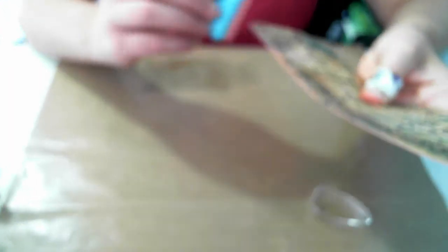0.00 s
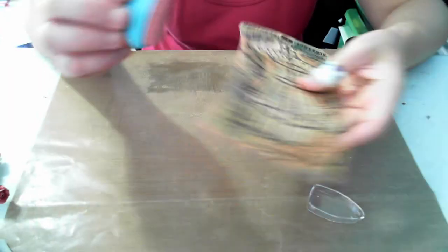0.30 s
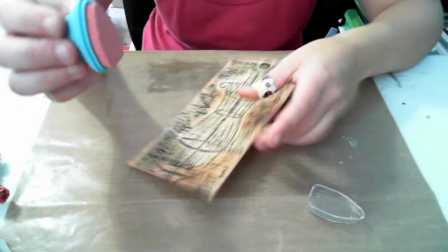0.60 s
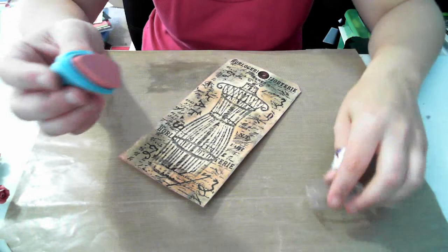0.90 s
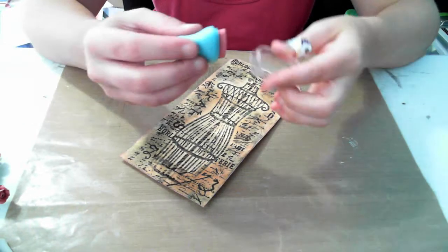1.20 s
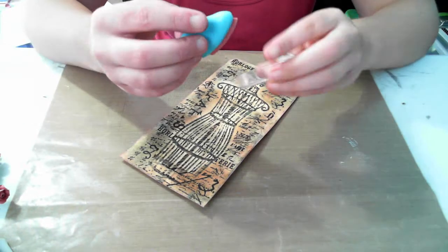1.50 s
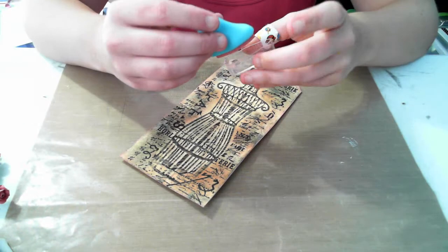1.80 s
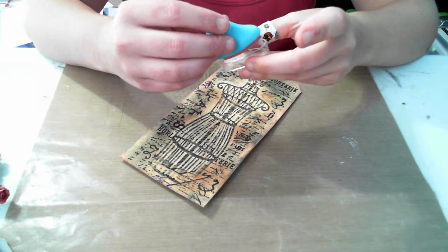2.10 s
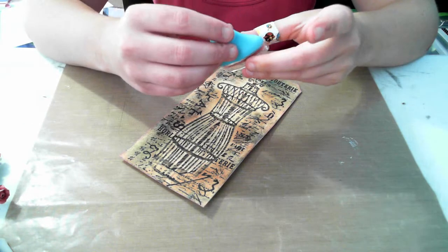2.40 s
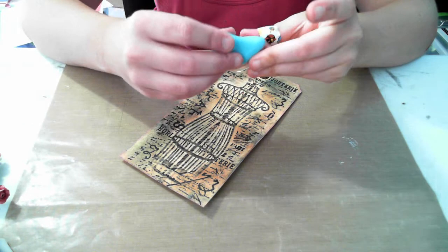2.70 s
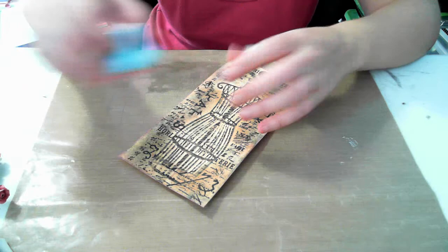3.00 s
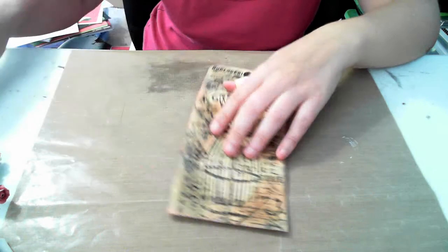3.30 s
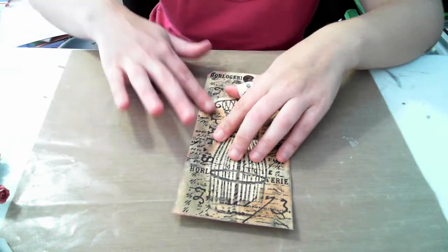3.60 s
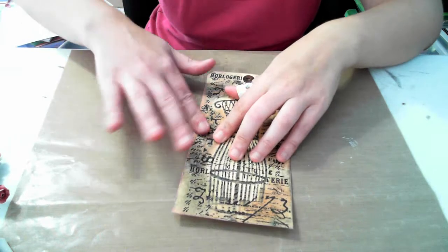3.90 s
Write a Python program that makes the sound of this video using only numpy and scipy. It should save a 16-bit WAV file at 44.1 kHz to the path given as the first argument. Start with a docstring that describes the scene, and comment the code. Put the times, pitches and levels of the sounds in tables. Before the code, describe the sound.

A small tool lands on a table with one loud knock. Before it, stiff card slaps down lightly and a plastic cap clicks on; afterwards, hands slide over the card. A fan hums in the small room.

```python
"""A stiff card flexes and slaps onto a mat, close up, over the rumble and hum of a fan in a small room.
Fingers lift a plastic cap, a leaning hand makes the table boom softly, and the cap snaps onto a small
tool. The tool is put down so hard that the microphone overloads, and rocks to rest. Hands then slide
over card and mat with a grainy hiss. Each contact is a set of ringing modes plus a burst of noise."""
import sys
import numpy as np
from scipy import signal
from scipy.fft import rfft, irfft, next_fast_len
from scipy.io import wavfile
from scipy.ndimage import map_coordinates

SR = 44100
rng = np.random.default_rng(int(sys.argv[2]) if len(sys.argv) > 2 else 0)


def pcm_store(signal):
    """Save signal as 16-bit PCM."""
    levels = np.round(np.clip(np.atleast_2d(signal), -1, 1) * 32767)
    wavfile.write(sys.argv[1], SR, levels.astype(np.int16).T)


N = 176400

# the tool lands and bounces: t/s, level/dB, low-pass f/Hz
TOOL_LANDING = [(3.2218, -1.5, 13700), (3.2308, -1.5, 10600), (3.2397, -10.5, 4030)]
# ring of the table top: f/Hz, level/dB, t60/s
TABLE_MODES = [(212.5, -5.5, 0.12), (230.3, -7.5, 0.13), (304, -6, 0.088), (437, 1.5, 0.086),
               (546, -4, 0.13), (662, -5.5, 0.094), (703, -2.5, .13), (757, -9.5, 0.15), (858, -10, 0.16),
               (896.5, -6.5, .13), (920, -9, 0.1), (1020, -9, 0.11), (1154, -9, .13), (1350, -16, 0.17),
               (2620, -17.5, 0.12), (2770, -20, .2)]
# the tool rocks to rest: t/s, level/dB, low-pass f/Hz
TOOL_ROCKS = [(3.3555, -22, 1400), (3.3665, -32, 900), (3.396, -25, 1200), (3.429, -27, 1500),
              (3.449, -41, 900)]
# ring of the tool against the table: f/Hz, level/dB, t60/s
TOOL_MODES = [(450, -5, .045), (570, 0, .035), (720, -2, .025)]
# noise colour of each knock: f/Hz, level/dB
KNOCK_EQ = [(150, -7), (300, -4), (550, -0.5), (1100, -1), (1750, -9.5), (2300, -9), (2750, -7.5),
            (3300, -14), (5800, -21.5), (7500, -18), (10000, -22.5), (16000, -19)]

def tool():
    """The tool hits hard and sets the table top ringing, then rocks with small, dull knocks."""
    landing = strikes(TOOL_LANDING, TABLE_MODES, KNOCK_EQ, blur=0.0013, ring_db=-2.5, attack_s=0.00065,
                      crack_db=0.5, crack_t60=0.014, rustle_db=-8.5, rustle_t60=0.17, wet_db=-14)
    rocking = strikes(TOOL_ROCKS, TOOL_MODES, KNOCK_EQ, blur=0.03, ring_db=0, attack_s=0.001,
                      crack_db=-6, crack_t60=0.02, rustle_db=-20, rustle_t60=0.05, wet_db=-14)
    return landing + rocking


# fingers lift the cap off the mat: t/s, level/dB, low-pass f/Hz
CAP_LIFT = [(.8754, -46, 12000), (.891, -37, 2200), (.899, -43.5, 1500), (.922, -41, 1400)]
# damped body of the mat: f/Hz, level/dB, t60/s
MAT_MODES = [(224, 4, 0.056), (570, 4.5, 0.057), (893, -7.5, 0.066), (1503, -3.5, 0.054)]
# noise colour of a bump on the mat: f/Hz, level/dB
MAT_EQ = [(200, -2), (700, 0), (1500, -3), (2200, -14), (4300, -5.5), (7000, -18), (16000, -16)]
# the cap touches and snaps home: t/s, level/dB, low-pass f/Hz
CAP_CLICKS = [(2.2812, -30, 4800), (2.3291, -43, 3000), (2.370, -39, 2500), (2.378, -23, 5500),
              (2.3847, -15.5, 15000), (2.4502, -37, 11000), (2.509, -43, 4000), (2.5132, -38, 5500)]
# ring of the plastic cap: f/Hz, level/dB, t60/s
CAP_MODES = [(1440, -5, 0.03), (2215, 4.5, .02), (2320, -1.5, 0.027), (3140, 4, 0.016), (3750, -2.5, 0.021),
             (5450, -15, .06), (6040, -4, 0.12), (7330, -12, 0.1), (8900, -17.5, 0.21), (13750, -11, .06)]
# noise colour of a click: f/Hz, level/dB
CAP_EQ = [(300, -29), (1000, -18), (2300, 4.5), (4500, 1), (6200, 3), (10000, -4.5), (16000, -2)]

def cap():
    """The cap leaves the mat with soft bumps and later snaps onto the tool with a bright plastic ring."""
    lift = strikes(CAP_LIFT, MAT_MODES, MAT_EQ, blur=0.067, ring_db=0.5, attack_s=0.0012,
                   crack_db=-1.5, crack_t60=0.027, rustle_db=-5, rustle_t60=0.13, wet_db=-10)
    snap = strikes(CAP_CLICKS, CAP_MODES, CAP_EQ, blur=0.025, ring_db=-4, attack_s=0.00037,
                   crack_db=3, crack_t60=0.011, rustle_db=-20, rustle_t60=0.19, wet_db=-15)
    return lift + snap


# the card flexes and slaps the mat: t/s, level/dB, low-pass f/Hz
CARD_FLICKS = [(.1755, -40, 5900), (.182, -37, 9000), (.2523, -35.5, 3000), (.261, -39, 3020),
               (.5618, -31, 7000), (.5698, -22, 13500), (.592, -34.5, 12000), (.6355, -39, 9000),
               (3.1757, -38, 6500)]
# body of the card: f/Hz, level/dB, t60/s
CARD_MODES = [(324, 0, 0.076), (1044, -15, 0.1), (3110, -2, 0.01)]
# noise colour of a flick: f/Hz, level/dB
CARD_EQ = [(200, 1), (1200, 2.5), (2000, -1), (4500, 1), (7000, -2), (10000, -7), (16000, 1.5)]

def card():
    """The stiff card flexes and drops flat: mostly crack, with little ring."""
    return strikes(CARD_FLICKS, CARD_MODES, CARD_EQ, blur=0.057, ring_db=-6, attack_s=0.00045,
                   crack_db=5, crack_t60=0.014, rustle_db=-11.5, rustle_t60=0.17, wet_db=-12.5)


# strokes of skin and card: start/s, peak/s, end/s, hiss level/dB, edges below peak/dB, drag level/dB
SLIDE_STROKES = [(0.236, 0.292, 0.41, -51, 9.5, -49), (0.462, 0.507, 0.51, -55, 10, -67),
                 (2.676, 2.798, 2.97, -63, 5, -75), (3.583, 3.715, 3.765, -41.5, 12, -42),
                 (3.79, 3.809, 3.84, -54, 26, -42), (3.816, 3.862, 3.92, -44, 8, -51.5),
                 (3.947, 3.98, 4.16, -47.5, 3, -41)]
# bright friction hiss: f/Hz, level/dB
HISS_EQ = [(800, -23), (1800, -5), (2800, 0), (4300, -2.5), (6500, -0.5), (9500, -2.5), (13500, -2),
           (16000, -13)]
# dull drag on the mat: f/Hz, level/dB
DRAG_EQ = [(120, 13), (300, 5), (550, -5), (1050, 6.5), (1700, -11), (2900, -10.5), (6000, -10),
           (16000, -40)]

def slides(grain_db=1.5, grain_hz=350, onset_s=0.0031, release_s=0.006):
    """Skin and card slide: each stroke swells and fades, a grainy hiss over the drag on the mat."""
    t, hiss_env, drag_env = np.arange(N) / SR, np.zeros(N), np.zeros(N)
    for start, peak, end, hiss_db, edge_db, drag_db in SLIDE_STROKES:
        gate = np.clip((t - start) / onset_s, 0, 1) * np.exp(-np.maximum(t - end, 0) / release_s)
        stroke = gate * amp(np.interp(t, [start, peak, end], [-edge_db, 0, -edge_db]))
        hiss_env += amp(hiss_db) * stroke
        drag_env += amp(drag_db) * stroke
    grain = amp(grain_db * wobble(grain_hz))
    friction = hiss_env * noise(HISS_EQ, N) + drag_env * noise(DRAG_EQ, N)
    return room(grain * friction, wet_db=-10.5)


# a hand leans on the table: peak t/s, level/dB, f/Hz, width/s
HAND_LEAN = (.965, -29, 96, .06)

def table_boom():
    """The table's lowest resonance swells softly under the hand."""
    peak, db, hz, width = HAND_LEAN
    t = np.arange(N) / SR - peak
    return amp(db) * np.exp(-(t / width) ** 2) * np.sin(2 * np.pi * hz * t)


# fingers turn the cap: start/s, peak/s, end/s, level/dB
FINGER_RUBS = [(0, 0.155, 0.83, -64), (1.384, 1.44, 1.73, -65.5), (1.74, 1.8, 1.9, -66)]
# skin on plastic: f/Hz, level/dB
RUB_EQ = [(300, -54), (750, 2.5), (1200, -9), (2400, -21), (3100, 13.5), (3900, -4), (6000, -22),
          (16000, -27)]

def fingers(edge_db=7, uneven_db=1.5, uneven_hz=30):
    """Fingertips rub on plastic with a faint, uneven whisper."""
    t, envelope = np.arange(N) / SR, np.zeros(N)
    for start, peak, end, db in FINGER_RUBS:
        swell_db = np.interp(t, [start, peak, end], [-edge_db, 0, -edge_db], left=-np.inf, right=-np.inf)
        envelope += amp(db + swell_db)
    return envelope * amp(uneven_db * wobble(uneven_hz)) * noise(RUB_EQ, N)


# fan hum and electrical whine: f/Hz, level/dB
HUM_TONES = [(58.6, -43.5), (118, -37), (543.7, -65.5), (742.9, -64.5), (1486, -76.5), (2229, -75.5),
             (13650, -74)]
# low end of the fan: f/Hz, level/dB
RUMBLE_EQ = [(12, -30), (22, -1.5), (34, 3), (56, -4.5), (74, -8.5), (92, -9), (108, -8), (130, -15.5),
             (152, -16.5), (185, -7.5), (225, -13.5), (275, -27), (330, -21), (450, -52.5), (1000, -62.5)]
# moving air: f/Hz, level/dB
AIR_EQ = [(150, -16), (400, 4), (850, -0.5), (1400, -4), (1900, -10), (2600, -10), (3100, -14), (4200, -15),
          (7000, -20.5), (13500, -22.5), (16000, -23)]

def fan(rumble_db=-35, air_db=-52.5, waver_db=4.27, waver_hz=5.97, drift_rad=0.13, drift_hz=4.53):
    """The fan lays a steady bed of rumble and air under a wavering hum and a thin electrical whine."""
    t, hum = np.arange(N) / SR, np.zeros(N)
    for hz, db in HUM_TONES:
        level = np.sqrt(2) * amp(db + waver_db * wobble(waver_hz))
        hum += level * np.sin(2 * np.pi * hz * t + drift_rad * wobble(drift_hz))
    return hum + amp(rumble_db) * noise(RUMBLE_EQ, N) + amp(air_db) * noise(AIR_EQ, N)


# reverb time of the small room: f/Hz, t60/s
ROOM_DECAY = [(150, 0.37), (800, 0.37), (3000, 0.38), (8000, 0.36), (16000, 0.23)]
# early reflections off near walls: delay/s, level/dB
WALL_ECHOES = [(.0084, -11), (0.019, -15.5), (0.0262, -33.5)]

def room(x, wet_db, build_s=0.025):
    """The direct sound, its wall echoes and a fresh reverb tail whose treble dies first."""
    hz, t, bands = signal.stft(rng.standard_normal(SR // 2), SR, nperseg=256)
    decay = amp(-60 * t / along(ROOM_DECAY, hz)[:, None])
    tail = signal.istft(bands * decay, SR, nperseg=256)[1]
    tail *= np.clip(np.arange(len(tail)) / SR / build_s, 0, 1) ** 2
    out = x + amp(wet_db) * signal.fftconvolve(x, tail / np.linalg.norm(tail))[:len(x)]
    for delay, db in WALL_ECHOES:
        add(out, delay, amp(db) * x)
    return out


def strikes(hits, modes, eq, blur, ring_db, attack_s, crack_db, crack_t60, rustle_db, rustle_t60, wet_db):
    """Each contact rings the modes and sheds a crack with a rustling tail; a low-pass sets its softness."""
    track, t = np.zeros(N), np.arange(SR // 2) / SR
    attack = 1 - np.exp(-t / attack_s)
    burst_env = amp(crack_db - 60 * t / crack_t60) + amp(rustle_db - 60 * t / rustle_t60)
    for start, db, cutoff_hz in hits:
        ring = sum(amp(mode_db + rng.normal(0, 1) - 60 * t / t60) * mode(hz, blur * hz, t)
                   for hz, mode_db, t60 in modes)
        hit = (amp(ring_db) * ring + burst_env * noise(eq, len(t))) * attack
        lowpass = signal.butter(2, min(cutoff_hz, 0.45 * SR), fs=SR)
        add(track, start, amp(db) * room(signal.lfilter(*lowpass, hit), wet_db))
    return track


def mode(hz, width_hz, t):
    """A partial whose pitch wanders at random over about width_hz."""
    wander = np.interp(t * width_hz, np.arange(1024), rng.standard_normal(1024))
    return np.sin(2 * np.pi * np.cumsum(hz + width_hz * wander) / SR)


def noise(eq, size):
    """Noise coloured by an EQ curve, scaled to rms 1."""
    m = next_fast_len(size + 8192)
    gain = amp(along(eq, np.fft.rfftfreq(m, 1 / SR)))
    x = irfft(rfft(rng.standard_normal(m)) * gain, m)[:size]
    return x / np.sqrt(np.mean(x ** 2) + 1e-20)


def wobble(rate_hz):
    """A smooth random modulator."""
    return map_coordinates(rng.standard_normal(8192), [np.arange(N) * rate_hz / SR], mode="wrap")


def along(curve, hz):
    """Read a curve at hz on a log frequency axis."""
    freqs, values = np.transpose(curve)
    return np.interp(np.log(hz + 1), np.log(freqs + 1), values)


def amp(db):
    """Decibels to gain."""
    return 10 ** (np.asarray(db) / 20)


def add(track, start_s, sound):
    """Mix a sound into the track at start_s."""
    part = track[round(start_s * SR):][:len(sound)]
    part += sound[:len(part)]


def scene():
    """The mono mix: craft work over the fan bed."""
    return (fan() + tool() + cap() + card() + slides() + fingers() + table_boom())[None]


def record(dry, top_hz=16000):
    """The small microphone clips at full scale and passes nothing above top_hz."""
    m = next_fast_len(N + 8192)
    clipped = np.clip(dry, -1, 1)
    passband = np.fft.rfftfreq(m, 1 / SR) < top_hz
    return irfft(rfft(clipped, m) * passband, m)[:, :N]


dry = scene()
out = record(dry)
pcm_store(out)
```